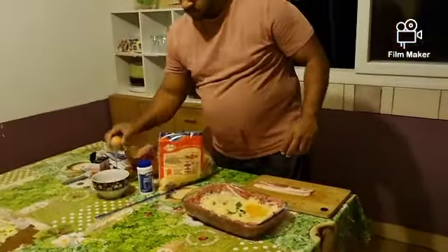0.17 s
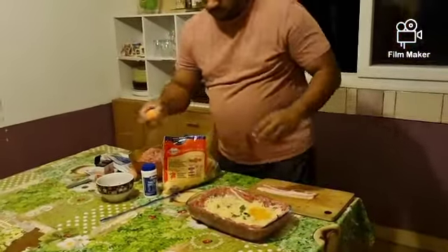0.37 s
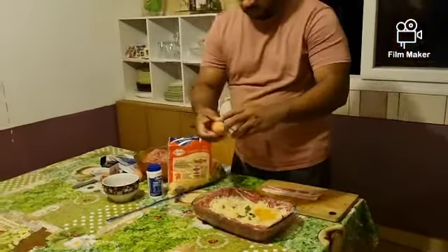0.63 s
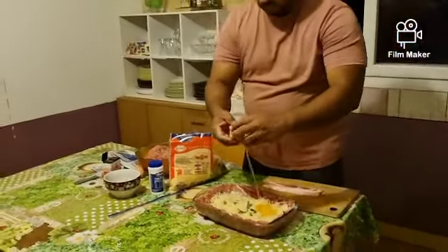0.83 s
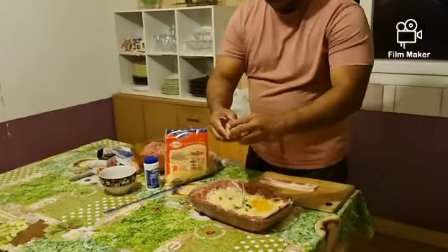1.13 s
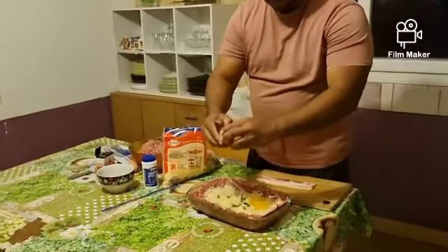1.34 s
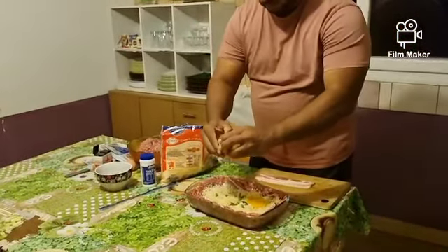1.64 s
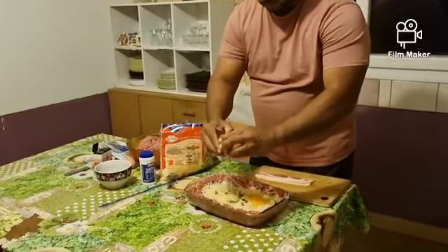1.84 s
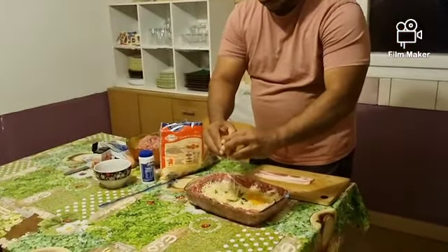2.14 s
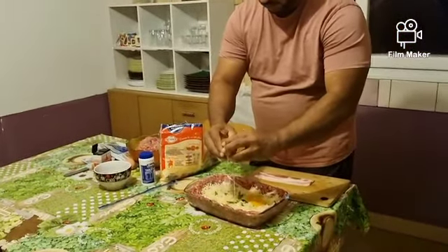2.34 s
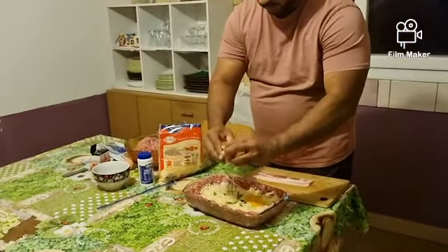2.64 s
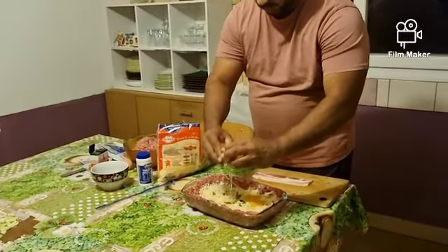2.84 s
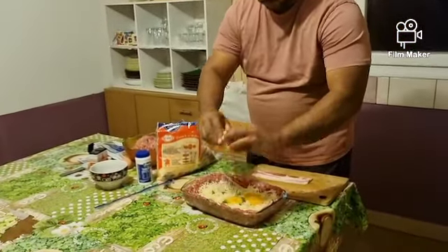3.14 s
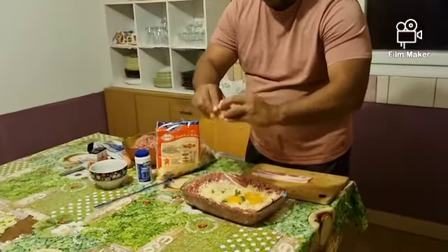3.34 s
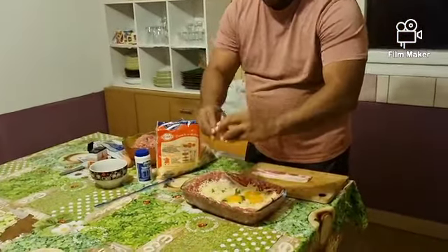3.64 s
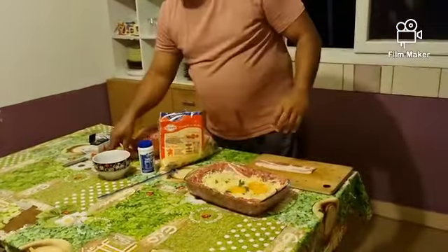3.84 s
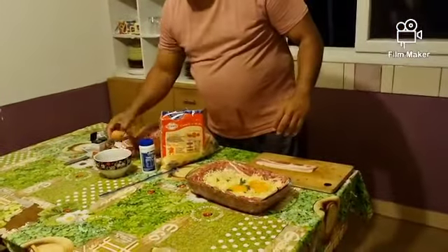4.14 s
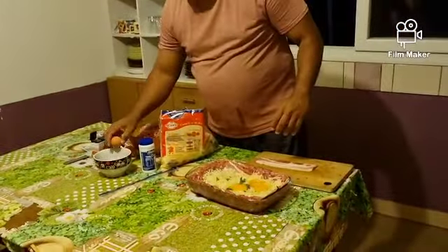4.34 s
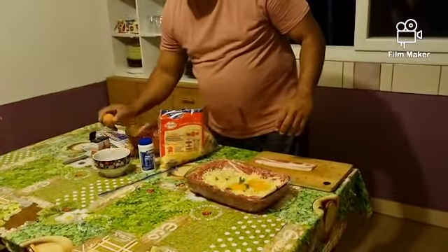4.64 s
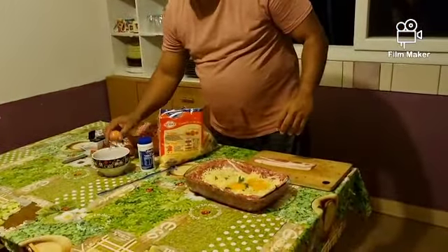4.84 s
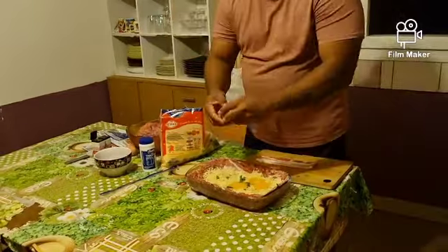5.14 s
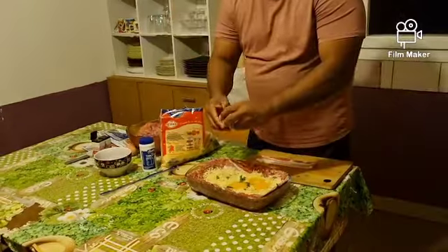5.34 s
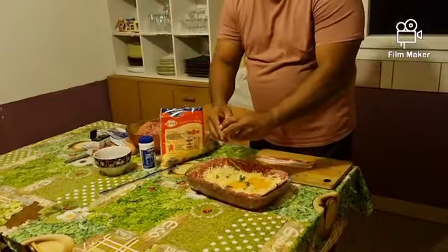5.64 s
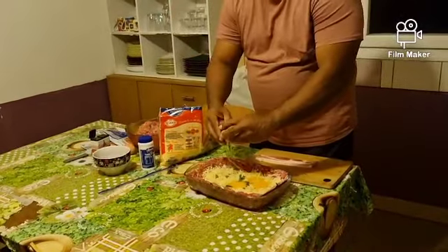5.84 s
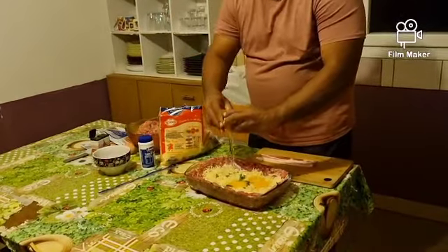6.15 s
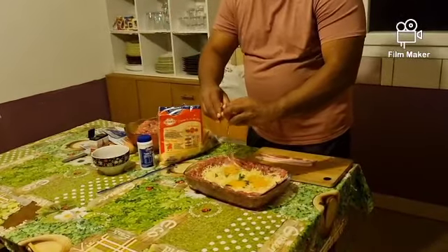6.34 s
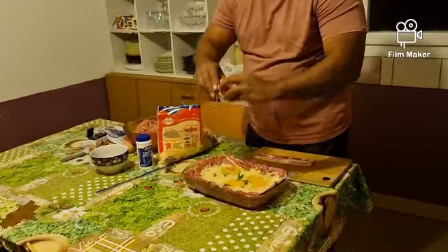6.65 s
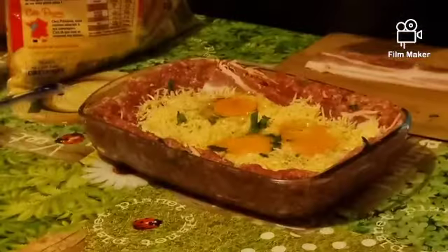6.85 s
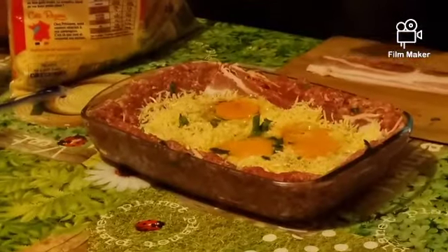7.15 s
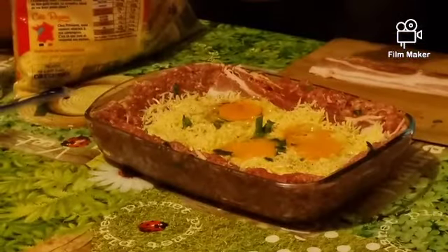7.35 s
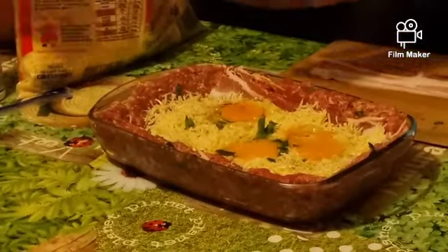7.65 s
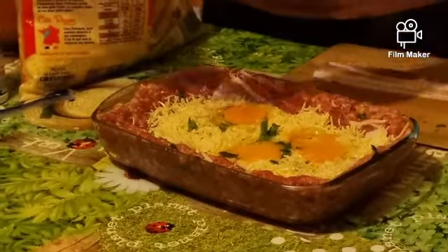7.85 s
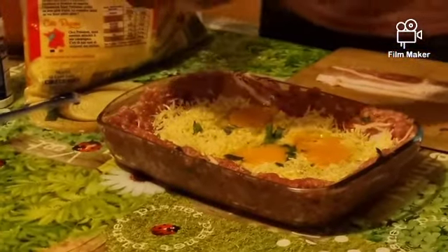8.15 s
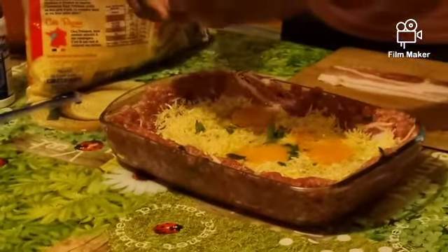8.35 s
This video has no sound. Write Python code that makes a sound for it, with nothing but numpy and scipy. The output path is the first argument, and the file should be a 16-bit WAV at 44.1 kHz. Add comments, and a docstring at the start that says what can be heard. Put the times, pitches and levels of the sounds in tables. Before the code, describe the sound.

A quiet small kitchen, heard in stereo with short, dense reflections and a faint low appliance hum that sinks early, then grows. At 0 s an egg only lightly touches a ceramic bowl. A faint thin whistle comes at 0.7 s and a tiny shell tick at 1.2. Thumbs rub softly from 1.4; dry crunches follow at 1.7, 2.1 and 2.4, then small ticks and another faint whistle near 3. Shell crackles around 3.7 to 3.9. At 4.2 light table bumps accompany a hollow egg tock. At 4.6 an egg cracks hard on the rim: a brief shimmering ring, the bowl dropping back, a table thud. Crunches return at 5.4 and 5.8 to 6.0, with faint whistles, rubbing and ticks through 6.8. At 7.07 the loudest, brightest knock throws splinters and rings. Room air is slightly stronger; a thin rising squeak starts near 8, and a crisp crack lands at 8.36.

```python
"""In a small kitchen, eggs are cracked on a ceramic bowl: one light touch, then two hard knocks on the rim.
The bowl rings as beating pairs of decaying modes, then drops back onto the table, whose modes boom.
Shells crunch and tick as thumbs rub and part them, and an egg knocks with a hollow tock: dying runs of
random impulses, filtered. Summed tones make a low appliance hum, gliding sines thin whistles, filtered
noise the room air. Paired noise with a set correlation spreads air and echoes over two microphones."""
import sys
import numpy as np
from scipy import signal
from scipy.fft import rfft, irfft
from scipy.io import wavfile
from scipy.ndimage import uniform_filter1d

SR = 44100
rng = np.random.default_rng(int(sys.argv[2]) if len(sys.argv) > 2 else 0)


def int16_out(signal):
    """Quantize to a 16-bit WAV file."""
    q = np.round(np.clip(np.atleast_2d(signal).T, -1, 1) * 32767)
    wavfile.write(sys.argv[1], SR, q.astype(np.int16))


N = 374409  # length in samples
T = np.arange(int(.7 * SR)) / SR  # time within one sound, s


def amp(db):
    """Decibel definition: amplitude gain is 10 to the power dB / 20."""
    return 10 ** (np.asarray(db) / 20)


def unit(x):
    """Energy normalisation: the squares sum to 1."""
    return x / np.sqrt(np.sum(x ** 2))


def fade(t60):
    """Exponential damping: a fall of 60 dB in t60 seconds."""
    return np.exp(-np.log(1000) * T / max(t60, 1e-3))


def at(points, hz):
    """Logarithmic interpolation: (Hz, value) points read on a log-frequency axis."""
    f, value = np.transpose(points)
    return np.interp(np.log(hz + 1), np.log(f), value)


def colour(x, points, tilt_db=0):
    """Minimum-phase filtering: a folded cepstrum gives a causal spectrum, tilted about 4 kHz."""
    hz = np.fft.rfftfreq(2 * len(x), 1 / SR)
    octaves = np.log2(np.maximum(hz, 500) / 4000)  # the tilt is flat below 500 Hz
    cepstrum = irfft(np.log(amp(at(points, hz) + tilt_db * octaves)))
    cepstrum[1:len(x)] *= 2
    cepstrum[len(x) + 1:] = 0
    response = np.exp(rfft(cepstrum))
    return irfft(rfft(x, 2 * len(x)) * response)[:len(x)]


def add(track, s, sound):
    """Superposition: mix a sound into the track at time s."""
    i = max(int(s * SR), 0)
    track[..., i:i + sound.shape[-1]] += sound[..., :N - i]


def walk(rate):
    """Band-limited fluctuation: random steps at the given rate in Hz, smoothed, spread near 1."""
    k = int(SR / rate)
    steps = np.repeat(rng.standard_normal(N // k + 1), k)
    return uniform_filter1d(steps, k)[:N]


# Likeness of diffuse sound at the two microphones. Each row: frequency in Hz, correlation from -1 to 1.
MIC_CORRELATION = [(100, 0.45), (280, 0.67), (600, -0.12), (1300, -0.45), (2800, 0.1), (6000, -0.069)]


def diffuse(size):
    """Diffuse-field coherence: two noise spectra share a set correlation; also returns their frequencies."""
    hz = np.fft.rfftfreq(size, 1 / SR)
    alike = np.clip(at(MIC_CORRELATION, hz), -.99, .99)
    mid, side = rfft(rng.standard_normal((2, size))) * np.sqrt([1 + alike, 1 - alike])
    return np.array([mid + side, mid - side]) / np.sqrt(2), hz


# Tones of the appliance hum. Each row: frequency in Hz, relative level in dB.
HUM_TONES = [(53, -9), (66.2, -0.5), (93.3, -17.5), (97.6, -5.5), (100, -26), (186.5, -18.5), (243, -28),
             (333, -14.5), (501, -16.5)]
# The hum sinks, then grows louder. Each row: time in seconds, level in dB before the trim in hum().
HUM_COURSE = [(0, -53.5), (1.4, -58), (3.7, -59), (4.1, -52.5), (6.7, -53), (7.1, -48.5), (8.49, -49.5)]


def hum(trim_db=-1, waver_db=3.1, drift_rad=0.55):
    """Superposed near-periodic tones: low motor tones wander independently in level and phase."""
    t = np.arange(N) / SR
    tones = np.zeros(N)
    for hz, db in HUM_TONES:
        level = amp(db + waver_db * walk(9))
        tones += level * np.sin(2 * np.pi * (hz * t + rng.random()) + drift_rad * walk(2.6))
    return np.sqrt(2) * tones * amp(trim_db + np.interp(t, *np.transpose(HUM_COURSE)))


# Spectrum of the room air. Each row: frequency in Hz, relative level in dB.
AIR_SPECTRUM = [(25, -16), (45, -25), (68, -13), (100, -11), (130, -23), (210, -21), (335, -17),
                (500, -18.5), (1000, -21), (3000, -30), (6200, -35.5), (7200, -44), (9300, -38.5),
                (11000, -44), (16000, -44)]
AIR_DB, AIR_RISE_S, AIR_RISE_DB = -56, 6.75, 2.5  # midrange level; start and size of a late rise


def air():
    """Filtered stationary noise: room air with a soft rumble, slightly louder late on."""
    noise, hz = diffuse(N)
    noise = noise * amp(at(AIR_SPECTRUM, hz))
    midrange = irfft(noise * ((hz > 250) & (hz < 3000)), N)
    rise = np.clip(10 * (np.arange(N) / SR - AIR_RISE_S), 0, 1)  # takes 0.1 s
    return irfft(noise, N) / midrange.std() * amp(AIR_DB + AIR_RISE_DB * rise)


def fracture(crumble_s, first=0.49, spread_db=3.5, breaks_per_s=4000):
    """Crack propagation: a first snap, then a dying run of tiny breaks as the crack spreads."""
    breaks = (rng.random(len(T)) < breaks_per_s / SR) * rng.choice([-1, 1], len(T))
    sizes = amp(spread_db * np.minimum(rng.exponential(size=len(T)), 2))
    dying = np.exp(-T / max(crumble_s, 5e-4))
    run = unit(breaks * sizes * dying + 1e-12)
    run[0] += first
    return run


# The stiff dome of the shell pings as it is first struck; level relative to the crack.
PING_HZ, PING_T60_S, PING_DB = 4990, 0.0023, -7.5


def ping():
    """Damped shell resonance: the brief ring of the intact shell, before it caves in."""
    return amp(PING_DB) * unit(fade(PING_T60_S) * np.sin(2 * np.pi * PING_HZ * T))


# Egg on the rim. Each row: start in seconds, bowl ring level in dB, place on the rim (about -1 to 1),
# crack level in dB, crumble time in seconds, treble tilt in dB per octave, splinter level in dB,
# push on the table in dB.
RIM_KNOCKS = [(0.001, -42, -0.7, -21, 0.011, 3.5, -50, -50),
              (4.6098, -23, -1.14, 5.5, 0.0038, -1, -6, -21.5), (7.0675, -17, 1, 10.5, 0.0028, 1, 6, -16.5)]
# Spectrum of shell caving in on the rim. Each row: frequency in Hz, relative level in dB.
RIM_SPECTRUM = [(100, -23), (600, 1), (1000, 3.5), (1400, 10), (2400, -2.5), (3400, 1), (4000, -10.5),
                (5300, 6.5), (6800, -3.5), (8800, -4), (10500, -8), (13000, -1.5), (16000, -4.5)]
# Spectrum of the bright splinters. Each row: frequency in Hz, relative level in dB.
SPLINTER_SPECTRUM = [(1000, -33), (7000, -19), (10800, -34.5), (12500, 4), (14500, -9), (16000, -5)]


def rim_cracks(snap=0.83, splinter_s=0.0078):
    """Impact fracture: the shell caves in on the hard rim; a harder blow throws off bright splinters."""
    out = np.zeros(N)
    for s, _, _, crack_db, crumble_s, tilt_db, splinter_db, _ in RIM_KNOCKS:
        crack = unit(colour(fracture(crumble_s, first=snap), RIM_SPECTRUM, tilt_db))
        splinters = unit(colour(fracture(splinter_s, first=0.28), SPLINTER_SPECTRUM))
        add(out, s, amp(crack_db) * (crack + ping()))
        add(out, s, amp(splinter_db) * splinters)
    return out


# Bowl wall modes, some in close pairs. Each row: frequency in Hz, relative level in dB,
# 60 dB decay time in seconds, dB gained per unit of place on the rim.
BOWL_MODES = [(1108, -16, .2, 1), (1394, 0, .32, 0), (1445, -11, .28, 4), (1500, -8, .09, 0),
              (3296, -11, .33, 2), (3327, -15, .42, -5), (5690, -16, .28, 3), (5729, -17, .41, 4),
              (5895, -21, .28, -1), (6277, -22, .25, 2), (8603, -22, .28, -4), (11930, -23, .23, -3),
              (12770, -22, .22, 4), (13740, -19, .2, -2)]


def bowl():
    """Split-mode beating: close wall modes beat; place and tilt of the blow set each mode's level."""
    out = np.zeros((2, N))
    # the microphones start nearly opposed in phase and fall into step as reflections fill the room
    apart_rad = np.array([[0], [2.7]]) * np.exp(-T / .22)
    for s, ring_db, place, _, _, tilt_db, _, _ in RIM_KNOCKS:
        for hz, db, t60, place_db in BOWL_MODES:
            gain = amp(ring_db + db + place * place_db + tilt_db * np.log2(hz / 4000))
            # arriving reflections make each line swell and dip
            ripple = amp(3 * walk(60)[:len(T)] * (1 - np.exp(-T / .04)))
            tone = np.sin(2 * np.pi * (hz * T + rng.random()) - apart_rad)
            add(out, s, gain * ripple * fade(t60) * tone)
    return out


# A hand bumps things on the table while fetching an egg. Each row: start in seconds, push in dB.
HAND_BUMPS = [(4.175, -30), (4.186, -26.5), (4.294, -36.5), (4.322, -37), (6.881, -46), (6.96, -42)]
BUMP_CONTACT_S, BUMP_LOWEST_HZ = 0.00043, 280  # light blows stir no deep bass
# every knock tips the bowl, which drops back harder a moment later
ROCK_S, ROCK_DB = .0665, 5.5
BOWL_CONTACT_S, ROCK_CONTACT_S, BOWL_LOWEST_HZ = .0015, 0.0011, 137


def blows():
    """Impulsive excitation: knocks, bowl drops and bumps as (s, dB, contact s, lowest Hz)."""
    knocks = [(s, db, BOWL_CONTACT_S, BOWL_LOWEST_HZ) for s, *_, db in RIM_KNOCKS]
    rocks = [(s + ROCK_S, db + ROCK_DB, ROCK_CONTACT_S, BOWL_LOWEST_HZ) for s, *_, db in RIM_KNOCKS]
    bumps = [(s, db, BUMP_CONTACT_S, BUMP_LOWEST_HZ) for s, db in HAND_BUMPS]
    return knocks + rocks + bumps


# Table-top modes. Each row: frequency in Hz, relative level in dB, 60 dB decay time in seconds.
TABLE_MODES = [(81, 7.5, 0.42), (162, -0.5, 0.21), (177.3, -0.5, 0.2), (213, 2, 0.17), (264.3, 2, 0.14),
               (290.8, 3, 0.24), (364, 0.5, 0.22), (445, -6.5, 0.25), (512, -5.5, 0.17), (695, -6.5, 0.31),
               (767, -4, 0.27)]
# Spectrum of the dull clatter. Each row: frequency in Hz, relative level in dB.
CLATTER_SPECTRUM = [(50, -74), (130, 9.5), (200, 8), (400, 4.5), (700, 1.5), (1150, -14), (1700, -13),
                    (6000, -31), (16000, -40)]


def table(boom_db=-11.5, clatter_db=17, clatter_t60=0.041):
    """Modal plate excitation: blows ring the top and clatter, duller for longer contact (boom, clatter)."""
    boom, clatter = np.zeros(N), np.zeros(N)
    ring = sum(amp(db) * fade(t60) * np.sin(2 * np.pi * hz * T) for hz, db, t60 in TABLE_MODES)
    for s, db, contact_s, lowest_hz in blows():
        low_pass = signal.butter(2, min(.5 / contact_s, SR / 4), fs=SR, output="sos")
        high_pass = signal.butter(3, lowest_hz, "high", fs=SR, output="sos")
        push = np.vstack([low_pass, high_pass])
        thud = unit(colour(rng.standard_normal(len(T)) * fade(clatter_t60), CLATTER_SPECTRUM))
        add(boom, s, amp(db + boom_db) * signal.sosfilt(push, ring))
        add(clatter, s, amp(db + clatter_db) * signal.sosfilt(push, thud))
    return boom, clatter


# Kitchen reverberation. Each row: frequency in Hz, 60 dB decay time in seconds.
KITCHEN_T60 = [(150, 0.38), (1000, 0.41), (5000, 0.27), (9000, 0.37), (15000, 0.21)]


def kitchen(x, build_s=0.00083):
    """Statistical reverberation: dense echoes from close walls, decaying at a rate set by frequency."""
    noise, hz = diffuse(len(T))
    centres = np.geomspace(100, 16000, 9)  # overlapping bands, Hz
    tail = 0
    for centre, share in zip(centres, np.eye(len(centres))):
        band = irfft(noise * at(np.c_[centres, share], hz), len(T))
        tail = tail + band * fade(at(KITCHEN_T60, centre))
    tail = tail * (1 - np.exp(-T / build_s))
    return np.array([signal.fftconvolve(x, unit(side))[:N] for side in tail])


# Thin whistling squeaks. Each row: start in seconds, length before release in seconds,
# starting pitch in Hz, level in dB before the lift in whistles().
SQUEAKS = [(.678, 0.13, 5020, -55), (2.99, 0.12, 5010, -54.5), (6.053, 0.074, 3170, -56),
           (6.47, 0.082, 3120, -63.5), (7.99, 0.03, 4830, -57.5), (8.072, 0.26, 5040, -51.5)]
WHISTLE_RISE_HZ_PER_S, WHISTLE_ATTACK_S, WHISTLE_RELEASE_S = 324, 0.009, 0.033


def whistles(lift_db=2.5, waver_hz=60, flutter_db=1.0):
    """Frequency modulation: a faint, rising, fluttering tone swells, holds and dies away."""
    out = np.zeros(N)
    for s, length_s, pitch_hz, db in SQUEAKS:
        hz = pitch_hz + WHISTLE_RISE_HZ_PER_S * T + waver_hz * walk(300)[:len(T)]
        attack = np.minimum(T / WHISTLE_ATTACK_S, 1)
        release = np.exp(-np.maximum(T - length_s, 0) / WHISTLE_RELEASE_S)
        gain = amp(db + lift_db + flutter_db * walk(89)[:len(T)])
        add(out, s, gain * attack * release * np.sin(2 * np.pi * np.cumsum(hz) / SR))
    return out


# Spectrum of shell sounds. Each row: frequency in Hz, relative level in dB.
SHELL_SPECTRUM = [(100, -22), (400, -8), (900, -2.5), (1700, 2), (2500, -2), (3300, 3), (5500, 3),
                  (7200, -8), (9000, -1.5), (11000, -8), (13500, -4), (16000, -9)]


def shell_sound(db, crumble_s, hollow_hz, hollow_db, tilt_db, hollow_q=9.4):
    """Cavity resonance: a cracking or knocked shell crackles and rings its hollow."""
    snap = fracture(crumble_s)
    hollow = signal.lfilter(*signal.iirpeak(hollow_hz, hollow_q, fs=SR), snap)
    crackle = unit(colour(snap, SHELL_SPECTRUM, tilt_db))
    return amp(db) * (crackle + amp(hollow_db) * unit(hollow))


# Shells crunch and tick; at 4.17 s an egg knocks on something with a hollow tock.
# Each row: start in seconds, level in dB, crumble time in seconds, hollow pitch in Hz,
# hollow level in dB relative to the crackle, treble tilt in dB per octave.
SHELL_SOUNDS = [(1.745, -24.5, 0.019, 563, 2.5, -3.5), (2.114, -22, 0.018, 1300, -6, 2),
                (2.135, -5.5, 0.0019, 1240, -24, -2.5), (2.159, -21, 0.011, 880, -3, 13),
                (2.441, -6, 0.0072, 1690, -3, 4), (3.669, -9.5, 0.0042, 1004, -1.5, -1),
                (3.708, -15, 0.024, 1205, 6, 0.5), (3.8595, -19, 0.0019, 1130, -4, -1.5),
                (4.1722, -40, 0.00065, 970, 23.5, 7), (5.415, -10.5, 0.006, 3260, -5, 1.5),
                (5.4643, -15.5, 0.0037, 2820, -7.5, 1.5), (5.848, -20.5, 0.0059, 1680, -7, -1),
                (6.001, -15, 0.029, 1690, -7.5, -1), (8.358, -7, 0.0036, 2160, -8, 3.5)]
# Thumbs pick at the shell. Each row: start in seconds, level in dB before the lift TICK_LIFT_DB.
SHELL_TICKS = [(1.1817, -44), (2.7884, -51.5), (2.8378, -48.5), (3.3337, -45.5), (3.4496, -47.5),
               (5.695, -50), (6.2941, -49), (6.7057, -46.5), (6.785, -47.5), (6.8074, -44.5)]
TICK_LIFT_DB, TICK_CRUMBLE_S, TICK_HOLLOW_HZ, TICK_HOLLOW_DB, TICK_TILT_DB = 23, 0.0033, 1997, -5.5, 2


def shells():
    """Resonator tuning: each crunch, and the tock, has its own hollow; the small ticks share one."""
    out = np.zeros(N)
    for s, *settings in SHELL_SOUNDS:
        add(out, s, shell_sound(*settings))
    for s, db in SHELL_TICKS:
        tick = shell_sound(db + TICK_LIFT_DB, TICK_CRUMBLE_S, TICK_HOLLOW_HZ, TICK_HOLLOW_DB, TICK_TILT_DB)
        add(out, s, tick)
    return out


# Thumbs rub on the shell before it gives. Each row: start in seconds, length in seconds, level in dB.
THUMB_RUBS = [(1.36, 0.47, -59.5), (2.24, 0.23, -60), (3.77, 0.087, -58.5), (6.42, 0.2, -60.5)]
# Spectrum of the rubbing. Each row: frequency in Hz, relative level in dB.
RUB_SPECTRUM = [(1000, -38), (2700, -16), (3400, 1), (4500, -2.5), (6400, -8.5), (7500, -22), (16000, -25)]


def rubs(slips_per_s=6000):
    """Stick-slip friction: skin slips over the shell in tiny steps; the pressure swells and eases."""
    out = np.zeros(N)
    for s, length_s, db in THUMB_RUBS:
        slips = (rng.random(len(T)) < slips_per_s / SR) * rng.standard_normal(len(T))
        scrape = colour(slips, RUB_SPECTRUM)
        pressure = np.sin(np.pi * np.minimum(T / length_s, 1))
        add(out, s, amp(db) * pressure * scrape / scrape.std())
    return out


def scene(direct_db=-6, boom_room_db=-12, left_db=-1.87):
    """Direct and reverberant fields: shell sounds arrive by both; bowl and table ring over hum and air."""
    boom, clatter = table()
    ring = bowl()
    cracks = shells() + rubs() + rim_cracks() + clatter
    direct = np.array([cracks, np.roll(cracks, 6)])  # 6 samples later on the right
    echoes = kitchen(cracks + amp(boom_room_db) * boom + ring[0] / 10 + whistles())
    mix = amp(direct_db) * direct + ring + boom + echoes + hum() + air()
    return mix * amp(np.array([[left_db], [-left_db]]) / 2)  # left_db is left relative to right


def record(dry):
    """Elliptic low-pass filtering: the top is cut steeply above 15.9 kHz."""
    return signal.sosfilt(signal.ellip(10, .2, 80, 15900, fs=SR, output="sos"), dry)


dry = scene()
out = record(dry)
int16_out(out)
```